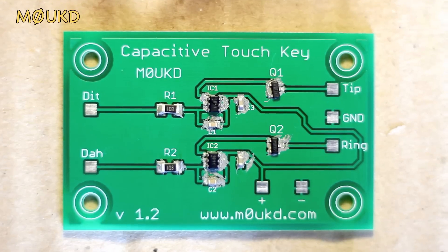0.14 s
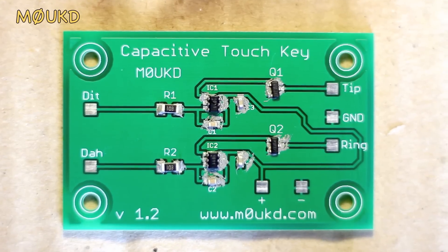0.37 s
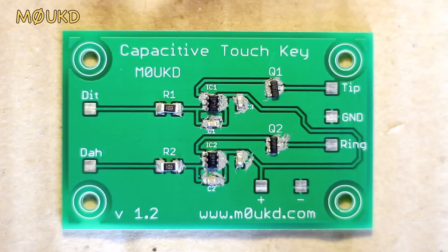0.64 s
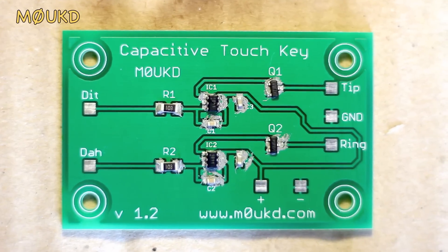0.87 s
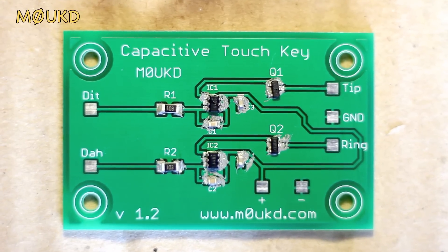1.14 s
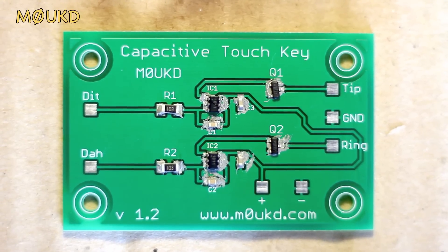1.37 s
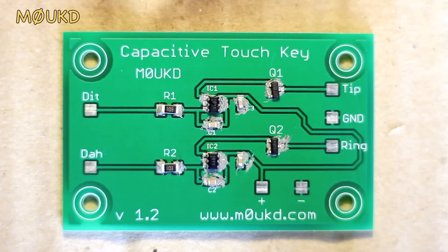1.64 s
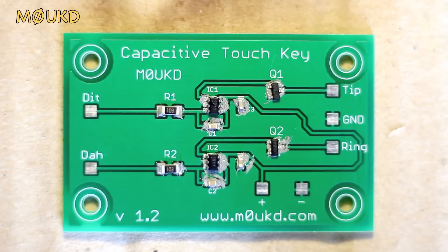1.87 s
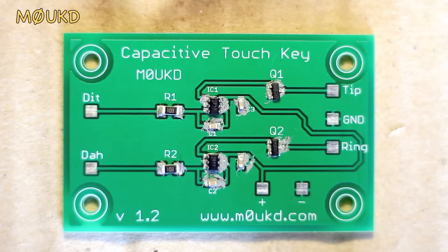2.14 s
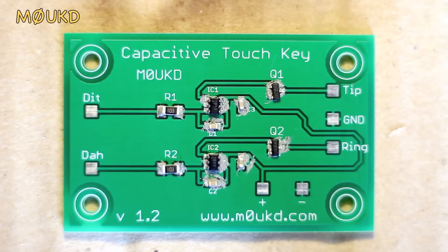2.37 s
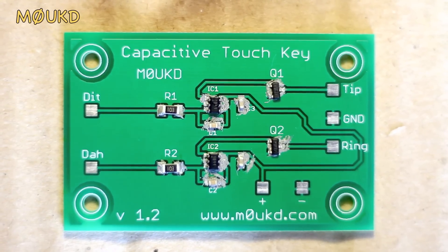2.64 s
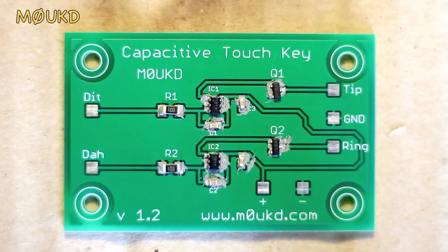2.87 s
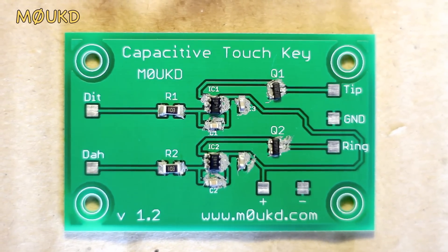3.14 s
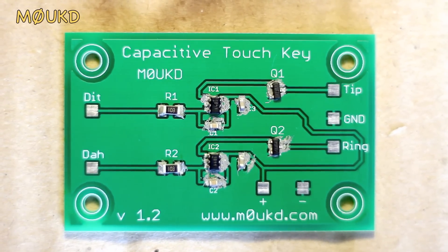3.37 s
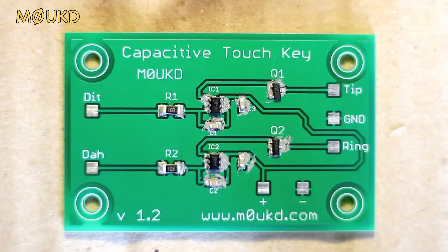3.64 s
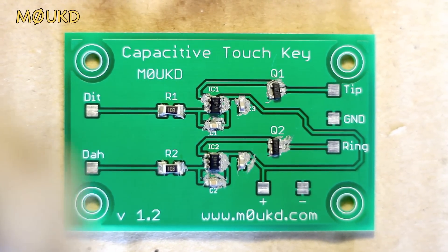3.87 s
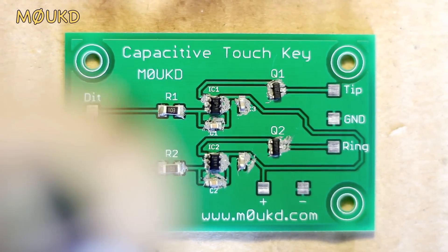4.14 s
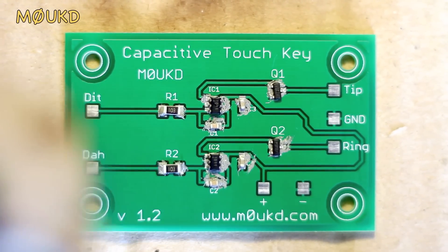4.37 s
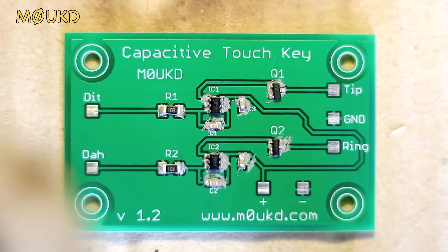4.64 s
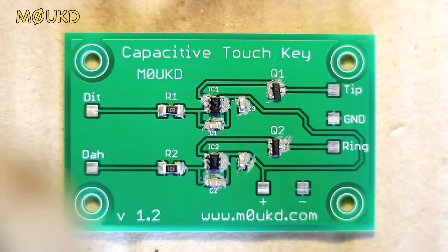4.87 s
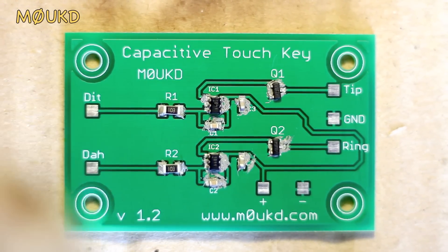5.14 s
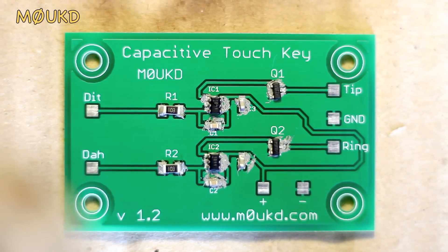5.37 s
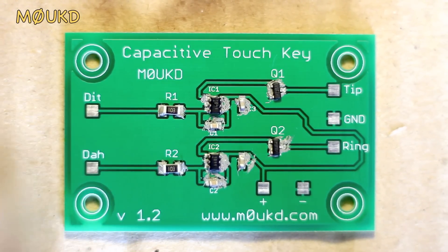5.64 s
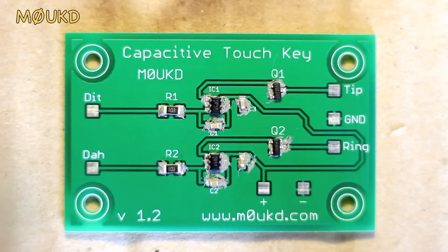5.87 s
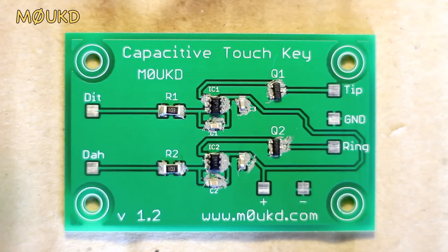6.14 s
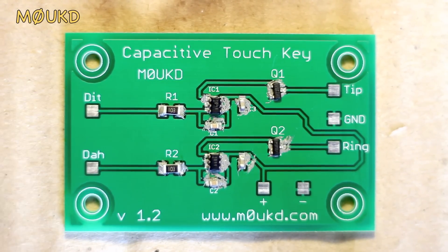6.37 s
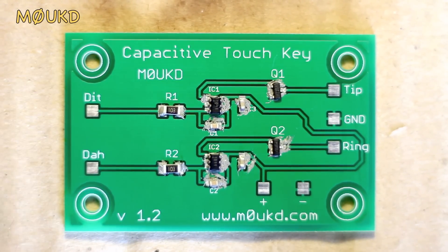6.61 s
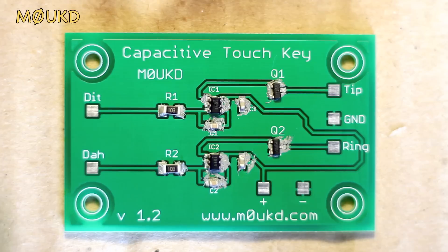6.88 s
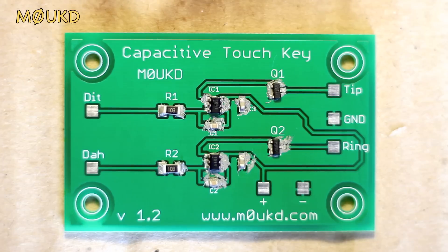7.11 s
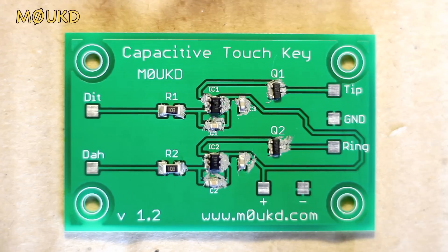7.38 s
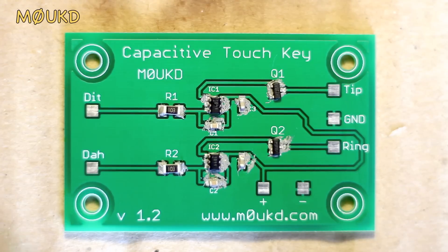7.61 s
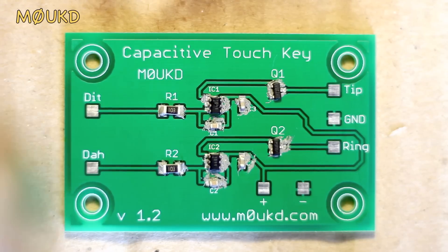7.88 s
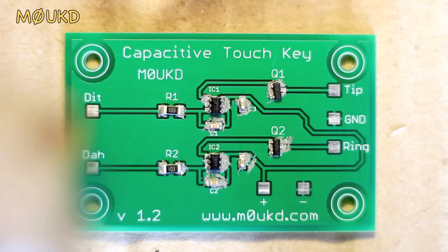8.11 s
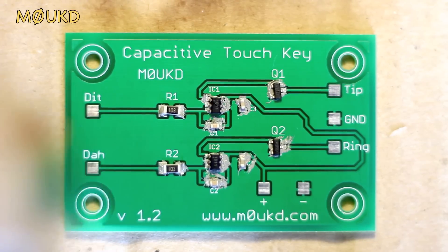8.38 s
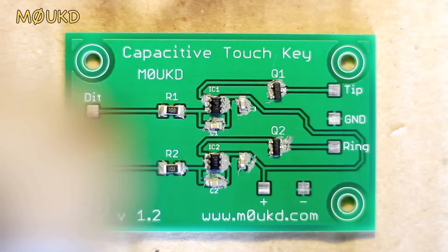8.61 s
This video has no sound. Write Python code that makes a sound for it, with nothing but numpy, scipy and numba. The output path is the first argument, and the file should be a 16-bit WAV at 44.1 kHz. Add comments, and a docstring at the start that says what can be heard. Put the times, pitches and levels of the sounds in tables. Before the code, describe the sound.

Quiet workshop with soft hum and low rumble. A sharp plastic switch click with a tiny rattle, then a hot air gun's motor rises swiftly in pitch and settles. Close, dense rushing air continues to the end, with a high whistle and faint whine; its tone shifts slightly as the hand moves. One near microphone, mono, fairly dry.

```python
"""At a quiet workbench, a hand-held hot air gun is switched on and blows steadily, close to one microphone.
The switch clicks: cracks and contact rattle ring the plastic casing. Filtered noise makes the roar in the barrel
and the hiss from the nozzle; sines that follow the motor as it spins up make its hum, whistle and whine.
Each time the hand moves, the colour of the air changes. Soft hum, hiss and a deep rumble fill the room."""
import sys
import numpy as np
from scipy import signal
from scipy.fft import rfft, irfft
from scipy.io import wavfile
from scipy.ndimage import uniform_filter1d
from numba import njit

SR = 44100
rng = np.random.default_rng(int(sys.argv[2]) if len(sys.argv) > 2 else 0)


def to_wav(sig):
    """Store sig (one row per channel, or 1-D mono) as 16-bit WAV at the path in sys.argv[1].

    Samples outside -1..1 are clipped; the rate is SR.
    """
    pcm = np.clip(np.atleast_2d(sig), -1, 1) * 32767
    pcm = np.round(pcm).astype(np.int16)
    wavfile.write(sys.argv[1], SR, pcm.T)  # frames by channels


def invert_db(x):
    """Field ratio 10**(x/20) for x, a level in decibels (scalar or array-like)."""
    u = np.asarray(x, float) / 20
    return 10 ** u


N = 385875  # samples, 8.75 s
T = np.arange(N) / SR  # time of each sample, s
F = np.maximum(np.fft.rfftfreq(N, 1 / SR), 1)  # frequencies of the whole sound, Hz


def level(x, db):
    """Scale a sound to an rms level in dB."""
    return x * invert_db(db) / np.sqrt(np.mean(x ** 2))


def columns(table):
    """Join the points of a time table with straight lines, one value per sample."""
    seconds, *rest = np.transpose(table)
    return [np.interp(T, seconds, column) for column in rest]


def swells(rows):
    """Level changes in dB that fade in and out over 0.2 s."""
    steps_db = sum(db * ((T >= start) & (T < end)) for start, end, db in rows)
    return uniform_filter1d(steps_db * 1., int(.2 * SR))


def walk(rate):
    """A smooth random wander with a spread near 1, aiming at a new value every 1 / rate seconds."""
    hold = int(SR / rate)
    steps = np.repeat(rng.standard_normal(N // hold + 1), hold)
    return 1.3 * uniform_filter1d(uniform_filter1d(steps, hold), hold)[:N]


def colour(points, bands=(), f=F):
    """Gain per frequency: a smooth spectrum with some bands lifted and others cancelled."""
    hz, db = np.transpose(points)
    bands_db = sum(lift_db / (1 + (2 * (f - centre) / width) ** 2) ** 2 for centre, width, lift_db in bands)
    return invert_db(np.interp(np.log(f), np.log(hz), db) + bands_db)


def noise(gain):
    """Fresh noise of a given colour, rms 1."""
    return level(irfft(rfft(rng.standard_normal(N)) * gain, N), 0)


def steady(x):
    """Even out the slow loudness to rms 1, keeping the colour."""
    return x / np.sqrt(uniform_filter1d(x ** 2, size=SR // 3))


@njit
def band(x, hz, q):
    """Keep a band around a moving centre (state-variable filter, gain 1 at the centre)."""
    y, middle, low, damping = np.empty(len(x)), 0., 0., 1 / q
    for i in range(len(x)):
        g = np.tan(np.pi * hz[i] / SR)
        v = (middle + g * (x[i] - low)) / (1 + g * (g + damping))
        middle, low = 2 * v - middle, low + 2 * g * v
        y[i] = damping * v
    return y


# colour of the room's hum and hiss (f/Hz, relative level/dB per Hz)
ROOM_COLOUR = [(76, -27), (130, -10.5), (176, -10.5), (215, -5.5), (384, -15.5), (838, -14.5), (926, -24),
               (1020, -17.5), (10700, -34.5), (15600, -45)]
# colour of the deep rumble (f/Hz, relative level/dB per Hz)
DEEP_COLOUR = [(20, -48), (40, -32), (70, -8), (100, 1), (125, -4), (150, 7), (200, -26), (330, -90)]
# the rumble comes and goes (from t/s, to t/s, level change/dB)
DEEP_SWELLS = [(0, .8, 7), (.8, 1.4, 12.5), (1.4, 2.6, 5.5), (2.6, 3.6, 8), (5.9, 7.3, 4), (7.3, 9, 6)]


def room():
    """Quiet hum and hiss of the workshop, noise with a few narrow bands, over a wandering deep rumble."""
    hum_bands = [(121.6, 10.7, 10.4), (207.5, 12, 4.3), (300, 86, 6.9)]  # (f/Hz, width/Hz, level/dB)
    hum = level(noise(colour(ROOM_COLOUR, hum_bands)), -44.5)
    deep_db = -59 + swells(DEEP_SWELLS) + 1.3 * walk(3.07)
    return hum + invert_db(deep_db) * noise(colour(DEEP_COLOUR))


# snaps of the switch (t/s, peak level/dB, crack level/dB, direct rattle level/dB,
# rattle tilt/dB per octave, rattle time scale/s)
CLICKS = [(0.494, -18, 11, -2.5, -7, 0.0067), (.6278, -25, -10, -7, 3, 0.0032)]
# tones of the plastic casing (f/Hz, relative level/dB, time to fall 60 dB/s)
SHELL = [(1054, -4, 0.047), (1230, -10, .04), (2500, -22, .04)]
# colour of the rattling contacts (f/Hz, relative level/dB per Hz)
RATTLE = [(500, -27), (1500, 3), (6000, 3.5), (10500, 2), (15000, -14), (15750, -50)]


def switch():
    """Each snap is a crack and a short rattle of contacts, heard directly and through the ringing casing."""
    out, t = np.zeros(N), np.arange(4096) / SR
    f = np.maximum(np.fft.rfftfreq(len(t), 1 / SR), 1)
    # 1000 ** (-t / t60) falls by 60 dB in t60 seconds
    ring = sum(invert_db(db) * np.sin(2 * np.pi * hz * t) * 1000 ** (-t / t60) for hz, db, t60 in SHELL)
    for start, peak_db, crack_db, rattle_db, tilt_db, decay in CLICKS:
        rattle = rng.standard_normal(len(t)) * t / decay * np.exp(1 - t / decay * 1.45)
        tilt = invert_db(tilt_db * np.log2(np.maximum(f, 500) / 4000))
        direct = irfft(rfft(rattle) * colour(RATTLE, f=f) * tilt)
        through_casing = .12 * signal.fftconvolve(rattle, ring)[:len(t)]
        crack = np.sin(2 * np.pi * 2600 * t) * 1000 ** (-t / 0.0055)
        snap = through_casing + invert_db(crack_db) * crack + invert_db(rattle_db) * direct
        i = int(start * SR)
        out[i:i + len(t)] += invert_db(peak_db) * snap / np.abs(snap).max()
    return out


FULL_HZ, START_S, SPIN_UP_S = 358.5, .635, .283  # full shaft speed, motor start, run-up time constant
# the shaft slows a little under changing load (t/s, drop in f/Hz)
SAG = [(2.7, 0), (3.15, 6.4), (3.5, 1.3), (4.08, 1.2), (4.4, 5.9), (4.7, 2.2), (5.27, 1), (5.55, 5.5),
       (5.72, 6.5), (6.0, 2.8), (6.25, 1.2), (6.75, 7.7), (8.1, 9.5), (8.75, 9.2)]


def shaft_hz():
    """Turns per second: the motor runs up towards full speed, quickly then gently, and later sags."""
    run_up = FULL_HZ * (1 - np.exp(-(T - START_S) / SPIN_UP_S))
    return np.maximum(run_up - columns(SAG)[0], 1)


# how far the gun is lifted, with its inlet towards the microphone (t/s, share 0-1)
LIFT = [(.7, 0), (1.1, 0.28), (1.55, 0.83), (2.6, 1), (3.3, 0.5), (4.2, 0.08), (4.8, 0.2), (5.6, 0.06),
        (6.0, 0.24), (8.75, 0)]


def lifted():
    """Lifting the gun changes the balance of its sounds: 0 is not lifted, 1 fully lifted."""
    return columns(LIFT)[0]


# echo of the hiss off the bench (t/s, lag/ms, share 0-1)
ECHO = [(1.05, 1.7, 0.1), (1.2, 1.5, 0.55), (1.35, 1.34, .55), (1.5, 1.25, 0.55), (1.75, 1.13, 0.45),
        (1.95, 1.08, 0)]


def bench_echo(x):
    """The bench returns the hiss a moment late and duller; the moving lag sweeps a comb of dips."""
    lag_ms, share = columns(ECHO)
    dull = irfft(rfft(x) / (1 + (F / 7000) ** 6), N)
    return x + share * np.interp(T - lag_ms / 1000, T, dull)


# colour of the blown air (f/Hz, relative level/dB per Hz)
AIR = [(60, -75), (300, -35.5), (450, -9.5), (640, -0.5), (850, -4.0), (1100, -1.0), (1500, -2.5),
       (2000, -2.75), (2800, -1.0), (3300, -9.0), (4200, -8.5), (6000, -8.5), (8000, -12.0), (10500, -14.5),
       (14500, -22.0), (15700, -29)]
# barrel resonances and the valleys between them (f/Hz, width/Hz, level/dB)
BARREL = [(700, 440, 1.5), (1037, 156, 7), (1500, 360, -1.5), (1780, 200, 4.5), (2160, 130, 2.5),
          (2320, 180, -3), (2480, 160, 4.5), (2714, 170, -2.5), (2900, 180, 5), (3600, 270, -2.5),
          (4030, 690, 2), (8300, 260, -2), (8750, 350, 4), (9270, 260, 3.5)]
# the hand moves to a new hold (t/s)
HOLDS = [.6, .97, 1.2, 1.75, 2.2, 2.6, 2.85, 3.2, 3.9, 5.8, 6.8, 8]
# reflections lift or cancel a band during a hold (from t/s, to t/s, f/Hz, width/Hz, level/dB)
SHIFTS = [(.6, 3.2, 700, 400, -2.5), (.6, 1.75, 2900, 500, -4.5), (.6, 1.2, 4600, 400, -7),
          (.6, 1.2, 5900, 450, 8.5), (.6, 1.2, 1280, 350, 3), (.6, 1.2, 2050, 600, -6.5),
          (.6, 1.2, 6840, 300, 5.5), (.6, 1.75, 8750, 300, 4), (.97, 3.2, 1020, 390, -7.5),
          (1.2, 3.2, 2450, 506, -6), (1.2, 1.75, 6500, 180, -14), (1.75, 3.2, 2110, 200, 5.5),
          (1.75, 2.6, 4120, 300, 5.5), (2.2, 2.6, 6000, 300, 8), (2.6, 3.2, 1320, 300, 6),
          (2.6, 3.2, 1730, 247, -4), (2.6, 3.9, 4760, 500, 5.5), (2.85, 3.2, 5680, 160, 10),
          (3.2, 3.9, 1020, 300, -2.5), (3.2, 3.9, 2900, 700, -2.5), (3.2, 3.9, 5740, 290, -8),
          (3.9, 5.8, 1270, 400, -2.5), (3.9, 5.8, 4550, 1310, -1.5), (5.8, 6.8, 6080, 383, -5),
          (5.8, 6.8, 7310, 400, 6), (6.8, 8, 7500, 400, 6), (1.75, 2.2, 3670, 300, -5),
          (1.75, 2.85, 7200, 300, -2), (3.9, 5.8, 5760, 300, 5), (6.8, 8, 9000, 400, 3),
          (8, 9, 3550, 456, 4.5), (8, 9, 4940, 1500, -1), (3.2, 3.9, 3960, 400, 4.5),
          (5.8, 8, 4100, 450, 1.5), (.6, 1.75, 740, 300, -3), (1.75, 2.6, 1010, 300, -3),
          (3.2, 8, 3600, 300, -3), (5.8, 8, 4720, 300, -1), (3.2, 3.9, 9200, 300, 3.5),
          (8, 9, 8750, 300, 3)]
# extra swirl while the gun is being raised (from t/s, to t/s, level change/dB)
SWIRL_HELD = [(.6, 2.45, 5.5)]


def airflow():
    """Turbulent air is noise whose colour fades from one hold to the next; returns roar and hiss."""
    white = rfft(rng.standard_normal(N))
    ends = HOLDS[1:] + [N / SR + .1]
    air = 0
    for start, end in zip(HOLDS, ends):
        middle = (start + end) / 2
        bands = BARREL + [row[2:] for row in SHIFTS if row[0] < middle < row[1]]
        during = (T < end) & ((T >= start) | (start == HOLDS[0]))
        held = uniform_filter1d(1. * during, size=SR // 6)
        # weak echoes from things on the bench, 0.8 to 4.8 ms late, ripple the treble
        lag, size = rng.uniform(size=(2, 6))
        ripple = sum(a * np.cos(2 * np.pi * F * (0.000799 + .004 * d)) for d, a in zip(lag, size))
        ripple_db = 2.6 * ripple * F / (F + 4000)
        air = air + held * level(irfft(white * colour(AIR, bands) * invert_db(ripple_db), N), 0)
    roar = irfft(rfft(air) / (1 + (F / 3200) ** 12), N)  # below about 3200 Hz; the rest is hiss
    # early on the swirl favours a band at five times the shaft rate, never below the loudest barrel mode
    swirl = band(roar, np.maximum(5 * shaft_hz(), 1030), 7.)
    swirl_db = 7.5 * np.exp(-np.maximum(T - START_S, 0) / 0.41) + swells(SWIRL_HELD)
    return steady(roar + (invert_db(swirl_db) - 1) * swirl), steady(bench_echo(air - roar))


# colour of the casing rumble (f/Hz, relative level/dB per Hz)
RUMBLE = [(50, -60), (130, -18), (200, -2.5), (323, 3.5), (345, 0.5), (387, -5), (450, -2), (580, -11),
          (990, -90)]
# the rumble is louder for a moment just after the start (from t/s, to t/s, level change/dB)
EARLY_SWELL = [(.75, 1.45, 4.5)]


def casing_rumble():
    """The casing shakes with low noise, louder with shaft speed and lift, and early on."""
    speed_gain_db = 8 * np.log10(shaft_hz() / FULL_HZ)
    return invert_db(-41 + 6 * lifted() + speed_gain_db + swells(EARLY_SWELL)) * noise(colour(RUMBLE))


# loudness of the blown air at the microphone, before small gusts (t/s, roar level/dB)
AIR_LOUDNESS = [(.64, -45), (.72, -37.5), (.77, -28.5), (.85, -21), (.97, -14.8), (1.07, -14.2),
                (1.17, -16.7), (1.4, -17), (1.55, -18), (2.35, -19), (2.58, -20.5), (3.1, -18),
                (5.0, -18.5), (7.45, -18), (7.71, -16.5), (8.2, -17.5), (8.75, -17)]


def blown_air():
    """Roar and hiss share small gusts of the flow; the hiss flickers on its own as well."""
    roar, hiss = airflow()
    gust_db = 0.043 * walk(6.5) + 0.6 * walk(30)
    hiss_db = -5.5 + 4.5 * lifted() + 0.89 * gust_db + 0.32 * walk(20)  # relative to the air loudness
    air = invert_db(columns(AIR_LOUDNESS)[0]) * (invert_db(gust_db) * roar + invert_db(hiss_db) * hiss)
    fade_in = np.clip((T - .62) / 0.078, 0, 1)
    return fade_in * (air + casing_rumble())


def tone(order, db, turns):
    """A sine that repeats `order` times per shaft turn, at an rms level in dB."""
    return np.sqrt(2) * invert_db(db) * np.sin(2 * np.pi * order * turns + order)


def speed_db():
    """Shaft speed in dB, 0 at full speed."""
    return 20 * np.log10(shaft_hz() / FULL_HZ)


# the shaft hum swells (from t/s, to t/s, level change/dB)
SHAFT_SWELLS = [(2.7, 3.6, 4), (8, 9, 2)]


def shaft_hum(turns):
    """The slightly unbalanced shaft hums once per turn."""
    db = -43 + 1.1 * speed_db() - 4.5 * lifted() + swells(SHAFT_SWELLS)
    return tone(1, db + 1.45 * walk(12), turns)


# the barrel carries the blade tone best near two of its resonances (f/Hz, base rms level/dB)
BLADE = [(300, -62), (900, -36), (2250, -35), (2500, -22), (2750, -23), (2790, -28), (2820, -29.5),
         (2855, -24)]
# the whistle swells and fades (from t/s, to t/s, level change/dB)
BLADE_SWELLS = [(1.5, 2.0, -3), (2.9, 3.32, -6), (4.5, 4.85, 2), (5.75, 6.45, 3), (7.9, 9, -5.5)]


def blade_whistle(turns):
    """Eight fan blades pass in each turn and whistle at eight times the shaft rate."""
    blades = 8
    db = np.interp(blades * shaft_hz(), *np.transpose(BLADE)) - 3.5 * lifted() + swells(BLADE_SWELLS)
    return tone(blades, db + 1.45 * walk(12), turns)


# commutator tones (cycles per shaft turn)
WHINE_ORDERS = (20, 25, 30, 34, 35)
# their base levels at full speed (rms level/dB)
WHINE_DB = (-44.5, -53, -45.5, -48, -50)
# the high tones beam, so each swells or fades as the gun turns;
# one list per tone (from t/s, to t/s, level change/dB)
WHINE_SWELLS = [
    [(1.8, 2.9, 8), (4.0, 5.3, 10.5), (5.8, 8.1, -11)],
    [(1.8, 3.7, 12), (6.2, 7.75, -10), (7.9, 9, 15)],
    [(1.8, 2.7, 8), (3.3, 3.9, 5), (4.3, 5.2, 8), (5.75, 6.7, 8), (7.05, 7.5, -18), (8.2, 9, 8)],
    [(1.8, 2.5, 7), (3.25, 3.7, 4), (5.5, 6.0, -8)],
    [(1.2, 1.9, -2), (3.5, 6.3, -5), (6.5, 9, 6)],
]
# further tones that come and go (cycles per shaft turn)
FURTHER_ORDERS = (16, 24, 26, 28, 32, 36)
# their base levels at full speed (rms level/dB)
FURTHER_DB = (-43, -60, -49, -68, -62, -57)


def commutator_whine(turns):
    """The commutator whines at many multiples of the shaft rate; the further tones wander the most."""
    whine = 0
    for order, db, rows in zip(WHINE_ORDERS, WHINE_DB, WHINE_SWELLS):
        whine = whine + tone(order, db + 2.1 * speed_db() + swells(rows) + 1.45 * walk(12), turns)
    for order, db in zip(FURTHER_ORDERS, FURTHER_DB):
        whine = whine + tone(order, db + speed_db() + 4 * walk(2.3), turns)
    return whine


def motor():
    """All motor tones follow one slightly unsteady shaft, so they rise and waver in pitch together."""
    turns = np.cumsum(shaft_hz() * (1 + 0.00041 * walk(40))) / SR
    fade_in = np.clip((T - .66) / .1, 0, 1)
    return fade_in * (shaft_hum(turns) + blade_whistle(turns) + commutator_whine(turns))


def scene():
    """One microphone, the same on both channels."""
    return np.tile(room() + switch() + blown_air() + motor(), (2, 1))


def top_cut(x):
    """Nothing passes above the cut-off."""
    return signal.sosfilt(signal.butter(12, 15760, fs=SR, output="sos"), x)


def record(dry):
    """The recorder cuts the top above 15.7 kHz with a steep low-pass filter."""
    low_pass = signal.ellip(8, .2, 70, 15700, fs=SR, output="sos")
    mix = signal.sosfilt(low_pass, dry)
    return top_cut(mix)


dry = scene()
out = record(dry)
to_wav(out)
```